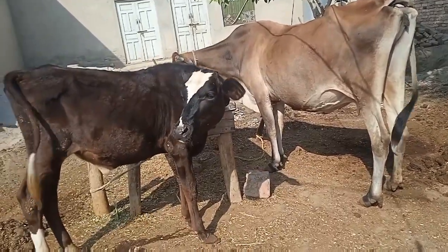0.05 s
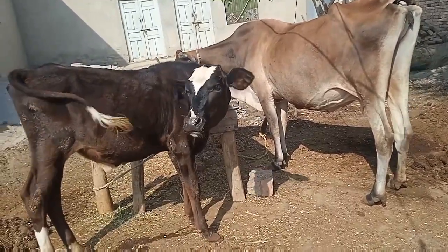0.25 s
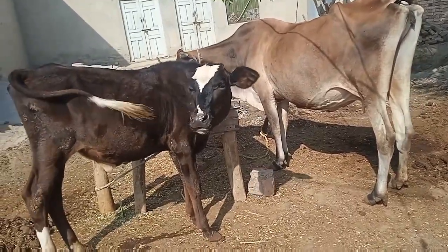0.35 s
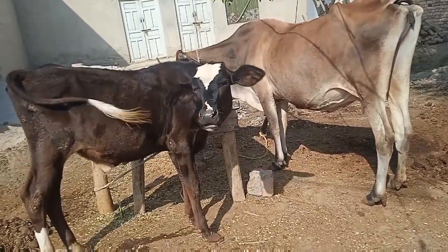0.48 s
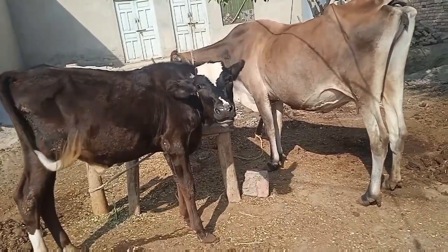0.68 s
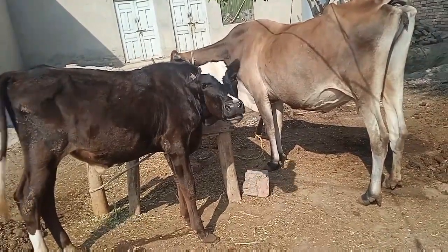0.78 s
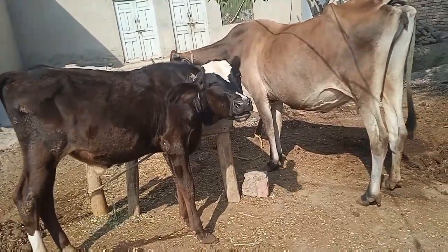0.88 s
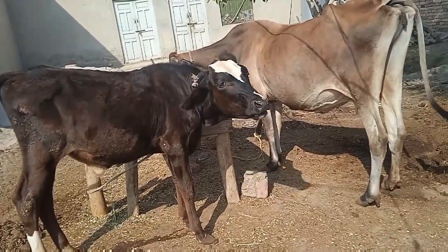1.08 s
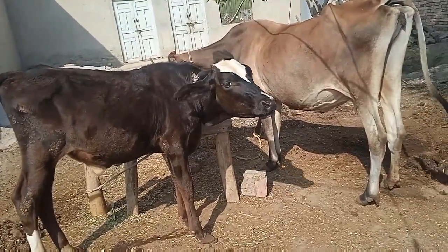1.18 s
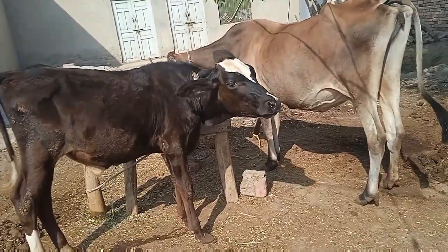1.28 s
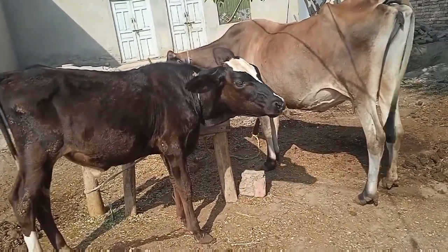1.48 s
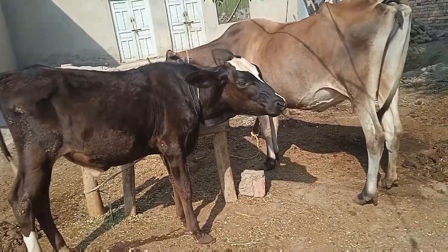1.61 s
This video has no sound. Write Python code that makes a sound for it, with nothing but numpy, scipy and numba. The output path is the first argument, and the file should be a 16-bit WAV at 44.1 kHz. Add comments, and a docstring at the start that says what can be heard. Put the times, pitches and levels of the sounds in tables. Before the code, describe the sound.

A calf moos once in a quiet outdoor farm yard. The call starts as a closed-mouth hum, opens into a steady, low, buzzy moo, then sags and fades, ending with a faint puff from the nose.

```python
"""A calf moos once in a walled farm yard. Vocal-fold pulses and turbulent air ring the throat,
mouth and nose: a closed-mouth hum opens into a steady, buzzy moo and sags into slow separate
pulses. The lips shut with a brief whistle and a short puff leaves the nose.
Ground and walls answer faintly over a quiet outdoor background."""
import sys
import numpy as np
from scipy import signal
from scipy.fft import rfft, irfft
from scipy.io import wavfile
from scipy.ndimage import uniform_filter1d
from numba import njit

SR = 44100
rng = np.random.default_rng(int(sys.argv[2]) if len(sys.argv) > 2 else 0)


def file_out(sig):
    """Save sig as 16-bit WAV at sys.argv[1]."""
    # one column per channel
    cols = np.atleast_2d(sig).T
    # limit, then scale
    lim = np.clip(cols, -1, 1)
    pcm = np.round(lim * 32767).astype(np.int16)
    wavfile.write(sys.argv[1], SR, pcm)


N = 72765
TIME = np.arange(N) / SR

# vocal-fold rate: time_s, pitch_hz
FOLD_PITCH = [(0.0, 89.1), (0.022, 92.94), (0.086, 100.2), (0.208, 110.6), (0.298, 113.7), (0.4, 115.2),
              (0.704, 116.4), (0.916, 115.2), (0.996, 113.2), (1.072, 109.3), (1.102, 106.8),
              (1.154, 99.79), (1.2, 92.35), (1.222, 85.4), (1.25, 75.9), (1.276, 67.8), (1.298, 59.94),
              (1.31, 58.25), (1.36, 54.1)]
# band levels before trim: time_s, throat_db, mouth_db, treble_db
BAND_LEVELS = [(0.0, -43, -48, -52.5), (0.116, -48, -45.5, -60.5), (0.192, -46, -53, -73),
               (0.212, -50, -35, -53), (0.242, -39.5, -30, -44.5), (0.302, -32.5, -26.5, -46),
               (0.444, -27.5, -25, -45.5), (0.61, -24, -26.5, -43), (0.71, -22.5, -25, -41.5),
               (0.846, -22.5, -23, -46), (1.052, -25.5, -26, -43.5), (1.094, -27.5, -26, -47.5),
               (1.124, -25.5, -27, -44.5), (1.154, -33, -23.5, -44.5), (1.176, -33.5, -30, -46),
               (1.234, -35, -38.5, -51), (1.284, -44, -44, -50.5), (1.29, -44.5, -46, -51),
               (1.314, -47.5, -55.5, -67), (1.365, -57, -70, -66)]
# trim by band name: gain_db
BAND_TRIM_DB = dict(throat=-2.5, mouth=-1, treble=0.5)
# turbulent air mixed with the pulses: time_s, gain_db
AIR_MIX = [(0, -20), (.18, -20), (.23, -11), (.32, -20), (.6, -22), (.95, -21), (1.1, -16), (1.2, -16),
           (1.36, -14)]
# chest hum: time_s, fundamental_db, second_harmonic_db
CHEST_LEVELS = [(0, -43, -61), (.1, -55, -51), (.18, -46.5, -43.5), (.25, -42.5, -49), (.4, -49.5, -48.5),
                (.6, -46.5, -50), (.95, -48.5, -49.5), (1.12, -46.5, -51), (1.2, -53.5, -52),
                (1.3, -60, -62.5), (1.38, -75, -60)]
# throat resonance, sharper once the mouth opens: time_s, centre_hz, width_hz
THROAT_RESONANCE = [(.05, 413, 111), (.12, 320, 265.4), (.18, 266, 227), (.24, 329, 130),
                    (.34, 364.5, 58.1), (.7, 347, 37.8), (1.05, 330, 37.04), (1.15, 319.7, 65.4),
                    (1.28, 321, 75.6)]
# mouth resonances, gains re the first: time_s, first_hz, second_hz, third_hz, second_db, third_db
MOUTH_RESONANCES = [(.05, 770, 1260, 1730, -12, 2.5), (.12, 814, 1049, 1722, -2.5, 5.5),
                    (.18, 880, 1000, 1620, -6, -10.5), (.24, 867, 1285, 1630, 10.5, 17.5),
                    (.32, 1058, 1300, 1620, -10.5, 4), (.42, 1109, 1327, 1530, -7, -9),
                    (.56, 1033, 1146, 1526, -5.5, -2.5), (.7, 911, 1248, 1522, 0.5, -3),
                    (.86, 915.2, 1158, 1483, 4.5, 5.5), (1.0, 894, 1180, 1490, 1.5, 0.5),
                    (1.15, 886, 1263, 1560, -10, -10.5), (1.21, 884, 1204, 1726, -9, 4.5),
                    (1.29, 824, 1278, 1678, -3, 9)]
# their widths before damping: first_hz, second_hz, third_hz
MOUTH_BASE_WIDTHS_HZ = [95, 133, 69]
# damping of the lower two: time_s, width_factor
MOUTH_DAMPING = [(0, 1.4), (.07, 1.5), (.12, 0.75), (.19, 0.78), (.24, 1.3), (.32, 1.05), (.7, .8),
                 (1.15, .8), (1.22, 1.28), (1.3, 2.3)]
# treble colour, 0 plain as at the moo's start and end, 1 as in its buzzy later part: time_s, share
TREBLE_COLOUR = [(0, 0.03), (.22, 0.13), (.42, 0.2), (.62, 0.68), (.85, 0.81), (1.08, 0.9), (1.2, 0.52),
                 (1.3, 0.1)]
# upper mouth and nose resonances: centre_hz, width_hz, plain_db, buzzy_db
TREBLE_RESONANCES = [(1978, 56, -2, 7.5), (2220, 131, 2.5, 6), (2662, 90, -4.5, 12), (2977, 150, -9.5, 6),
                     (3530, 170, -15.5, -6.5), (3768, 74, -8, -15.5), (4410, 70, -20.5, -20.5)]
# treble top against its lower part: time_s, gain_db
TREBLE_SHELF = [(0, -0.5), (.12, -8), (.2, -1.5), (.24, -0.5), (1.29, 8), (1.33, 7)]
# highest resonances, before glide: centre_hz, width_hz, plain_db, buzzy_db
SIZZLE_RESONANCES = [(5220, 140, -3, -6), (5800, 48, 7.5, -2), (6420, 110, 2.5, -14),
                     (6850, 130, -14.5, -1.5), (8640, 1200, -23, -18)]
# their glide as the neck stretches: time_s, frequency_factor
NECK_GLIDE = [(.25, 1.06), (.42, 1.015), (.58, 1.01), (.84, 1.005), (1.05, .99), (1.2, 0.94)]
# sizzle re treble: time_s, level_db
SIZZLE_MIX = [(0, -22), (.2, -32), (0.231, -28), (.36, -23), (.55, -27.5), (0.701, -35.5), (0.831, -26),
              (1.0, -33.5), (1.149, -26.5), (1.3, -24.5)]
# nose puff: frequency_hz, relative_db
PUFF_SPECTRUM = [(200, -10), (600, -1), (1300, 0), (2200, -2), (3000, -12), (3700, -10), (4700, -22),
                 (5250, -22), (5450, -8), (5750, -8), (6000, -19), (6600, -19), (7500, -34), (10000, -50)]
# ground and wall echoes: delay_s, gain_db
YARD_ECHOES = [(.0031, -11), (0.023, -20), (0.051, -34)]
# diffuse tail: frequency_hz, relative_db
TAIL_SPECTRUM = [(50, -18), (110, -2), (200, -4), (350, -5), (600, 1), (1000, 1), (2000, 0), (4000, -2),
                 (9000, -6)]
# outdoor noise: frequency_hz, relative_db
OUTDOOR_SPECTRUM = [(25, -13), (45, -6.5), (70, 0.5), (170, 5.5), (300, -9), (800, -14.5), (2000, -14.5),
                    (3200, -22), (4500, -20.5), (6000, -27), (8000, -38.5), (15000, -42)]


def moo(end_s=1.38, release_s=.043, treble_air_db=8.5, sizzle_air_db=-.5):
    """Pulses and air ring throat, mouth and nose, each band levelled, over a chest hum."""
    cycles, pulses, air = vocal_folds()
    air_db, = in_time(AIR_MIX)
    source = nasal_notch(pulses + from_db(air_db) * air)
    throat = levelled(throat_ring(source), cycles)
    mouth = levelled(mouth_ring(source), cycles)
    treble = levelled(treble_ring(pulses + from_db(air_db + treble_air_db) * air), cycles)
    sizzle = levelled(sizzle_ring(pulses + from_db(sizzle_air_db) * air), cycles)
    throat_db, mouth_db, treble_db = in_time(BAND_LEVELS)
    sizzle_db, = in_time(SIZZLE_MIX)
    voice = (chest_hum(cycles)
             + from_db(throat_db + BAND_TRIM_DB["throat"]) * throat
             + from_db(mouth_db + BAND_TRIM_DB["mouth"]) * mouth
             + from_db(treble_db + BAND_TRIM_DB["treble"]) * (treble + from_db(sizzle_db) * sizzle))
    return voice * np.clip((end_s - TIME) / release_s + 1, 0, 1)


def vocal_folds(jitter=.00078, shimmer_db=.03):
    """Cycle count, one sharp pulse per cycle, and air rushing with each pulse."""
    pitch_hz, = in_time(FOLD_PITCH)
    first_pulse_s = .006
    cycles = np.cumsum(pitch_hz * (1 + jitter * drift(rate_hz=50))) / SR - first_pulse_s * pitch_hz[0]
    offset_samples = (cycles - np.round(cycles)) * SR / pitch_hz
    window = np.exp(-(offset_samples / 20) ** 2)
    pulses = -np.sinc(offset_samples / 2) * window * np.sqrt(SR / pitch_hz) / 2
    air = rms_one(rng.standard_normal(N) * (.25 + np.exp(-4 * (cycles % 1))))
    return cycles, pulses * from_db(shimmer_db * drift(rate_hz=50)), air


def nasal_notch(x, centre_hz=569.6, width_hz=94):
    """The nasal passage absorbs one narrow band."""
    return signal.lfilter(*signal.iirnotch(centre_hz, centre_hz / width_hz, fs=SR), x)


def throat_ring(x):
    """One low, moving throat resonance."""
    centre_hz, width_hz = in_time(THROAT_RESONANCE)
    return band(resonate(x, [(centre_hz, width_hz, 0)]), 265, 580, order=2)


def mouth_ring(x):
    """Three resonances moving with jaw and lips."""
    *centres_hz, second_db, third_db = in_time(MOUTH_RESONANCES)
    damping, = in_time(MOUTH_DAMPING)
    widths_hz = [hz * factor for hz, factor in zip(MOUTH_BASE_WIDTHS_HZ, (damping, damping, 1))]
    ring = resonate(x, zip(centres_hz, widths_hz, (0, second_db, third_db)))
    return band(ring, 744, 1620, order=4)


def treble_ring(x, corner_hz=2500):
    """Mouth and nose ring; the top is muffled by shut lips at first, lifted later."""
    ring = band(upper_resonances(x, TREBLE_RESONANCES), 1200, 4150, order=5)
    crossover = (signal.butter(4, corner_hz, kind, fs=SR, output="sos") for kind in ("low", "high"))
    low, high = (signal.sosfilt(np.tile(sos, (2, 1)), ring) for sos in crossover)
    shelf_db, = in_time(TREBLE_SHELF)
    return low + from_db(shelf_db) * high


def sizzle_ring(x):
    """Thin top ring, sliding as the neck stretches."""
    glide, = in_time(NECK_GLIDE)
    return band(upper_resonances(x, SIZZLE_RESONANCES, glide), 4200, 8800, order=3)


def upper_resonances(x, table, glide=1, waver_db=2, waver_hz=6.4):
    """Resonances of alternating sign; gains follow the treble colour and waver with the soft tissue."""
    colour, = in_time(TREBLE_COLOUR)
    ring = np.zeros(N)
    for k, (centre_hz, width_hz, plain_db, buzzy_db) in enumerate(table):
        gain_db = plain_db + colour * (buzzy_db - plain_db) + waver_db * drift(waver_hz)
        ring += (-1) ** k * resonate(x, [(centre_hz * glide, width_hz, gain_db)])
    return ring


def chest_hum(cycles, attack_s=.012):
    """The chest radiates the two lowest harmonics."""
    hum = sum(from_db(level_db) * np.sqrt(2) * np.cos(2 * np.pi * harmonic * cycles)
              for harmonic, level_db in enumerate(in_time(CHEST_LEVELS), start=1))
    return np.minimum(TIME / attack_s, 1) * hum


def lip_whistle(peak_s=1.293, spread_s=.008, pitch_hz=3130, width_hz=70, level_db=-52):
    """Air squeezes through the last gap of the lips."""
    gap = [(pitch_hz, width_hz, 0)]
    tone = rms_one(resonate(resonate(rng.standard_normal(N), gap), gap))
    return from_db(level_db) * np.exp(-((TIME - peak_s) / spread_s) ** 2) * tone


def nose_puff(start_s=1.395, attack_s=.0017, level_db=-55.5, fade_db_per_s=85):
    """The folds part; the remaining air leaves in a short hiss."""
    age_s = np.maximum(TIME - start_s, 0)
    envelope = np.minimum(age_s / attack_s, 1) * from_db(level_db - fade_db_per_s * age_s)
    return envelope * coloured_noise(PUFF_SPECTRUM)


def yard(x, t60_s=.6, build_s=.01, tail_db=-22.5):
    """Ground and walls return three echoes and a faint diffuse tail."""
    echoes = sum(from_db(gain_db) * np.interp(TIME - delay_s, TIME, x, left=0)
                 for delay_s, gain_db in YARD_ECHOES)
    tail = coloured_noise(TAIL_SPECTRUM) * from_db(-60 * TIME / t60_s) * (1 - np.exp(-TIME / build_s))
    tail /= np.sqrt(np.sum(tail ** 2))
    return echoes + from_db(tail_db) * signal.fftconvolve(x, tail)[:N]


def outdoor_background(level_db=-67):
    """Steady, mostly low noise."""
    return from_db(level_db) * coloured_noise(OUTDOOR_SPECTRUM)


def from_db(db):
    """Decibels to gain."""
    return 10 ** (np.asarray(db) / 20)


def rms_one(x):
    """Scale to unit rms."""
    return x / np.sqrt(np.mean(x ** 2) + 1e-20)


def in_time(rows):
    """Value columns, interpolated per sample."""
    times_s, *columns = np.transpose(rows)
    return [np.interp(TIME, times_s, column) for column in columns]


def band(x, low_hz, high_hz, order):
    """Butterworth band-pass."""
    return signal.sosfilt(signal.butter(order, [low_hz, high_hz], "band", fs=SR, output="sos"), x)


def drift(rate_hz):
    """Random wander, unit rms."""
    low_pass = signal.butter(2, rate_hz, fs=SR, output="sos")
    return rms_one(signal.sosfilt(low_pass, rng.standard_normal(2 * N))[N:])


def coloured_noise(spectrum):
    """Shaped noise, unit rms."""
    hz, db = np.transpose(spectrum)
    bins_hz = np.maximum(np.arange(N // 2 + 1) * SR / N, 1)
    gain = from_db(np.interp(np.log(bins_hz), np.log(hz), db))
    return rms_one(irfft(rfft(rng.standard_normal(N)) * gain, N))


@njit
def two_pole(x, angle_rad, radius):
    """Moving pole pair, peak gain near 1."""
    out, state = np.zeros(len(x)), 0j
    for i in range(len(x)):
        state = state * radius[i] * np.exp(1j * angle_rad[i]) + x[i]
        out[i] = 2 * (1 - radius[i]) * state.real
    return out


def resonate(x, resonances):
    """Parallel resonances, steady or moving."""
    ring = np.zeros(N)
    for centre_hz, width_hz, gain_db in resonances:
        angle_rad = np.full(N, 2 * np.pi * centre_hz / SR)
        radius = np.full(N, np.exp(-np.pi * width_hz / SR))
        ring += from_db(gain_db) * two_pole(x, angle_rad, radius)
    return ring


def levelled(x, cycles):
    """Hold rms at 1 over two fold cycles."""
    energy = np.cumsum(x ** 2)
    start, end = (np.interp(cycles + step, cycles, np.arange(N)).astype(int) for step in (-1, 1))
    power = (energy[end] - energy[start]) / (end - start)
    return x / np.sqrt(uniform_filter1d(power, size=600) + 1e-18)


def scene():
    """Calf, yard and background, mono."""
    calf = moo() + lip_whistle() + nose_puff()
    return (calf + yard(calf) + outdoor_background())[None]


def record(dry, low_cut_hz=62, stopband_hz=15700):
    """The microphone thins the deep bass; the top is cut steeply."""
    thinned = signal.sosfilt(signal.butter(4, low_cut_hz, "high", fs=SR, output="sos"), dry)
    return signal.sosfilt(signal.cheby2(12, 70, stopband_hz, fs=SR, output="sos"), thinned)


dry = scene()
out = record(dry)
file_out(out)
```